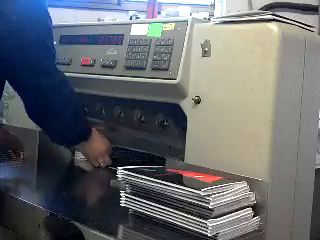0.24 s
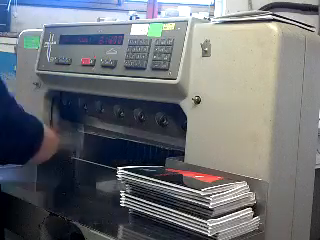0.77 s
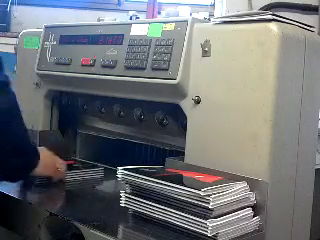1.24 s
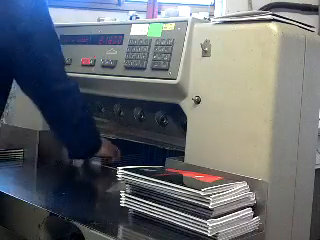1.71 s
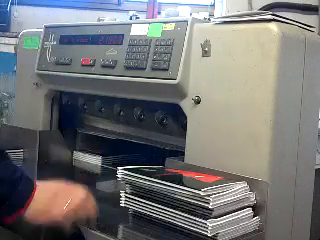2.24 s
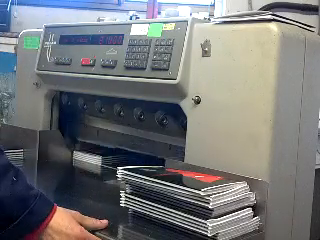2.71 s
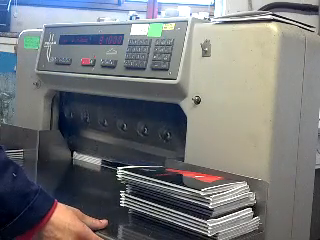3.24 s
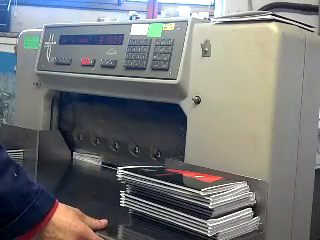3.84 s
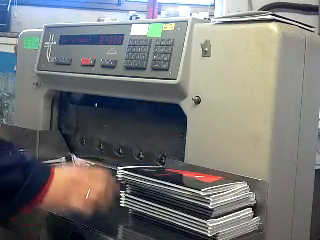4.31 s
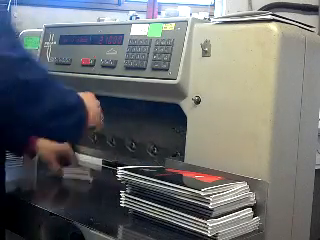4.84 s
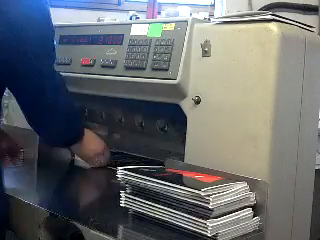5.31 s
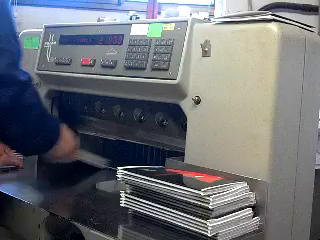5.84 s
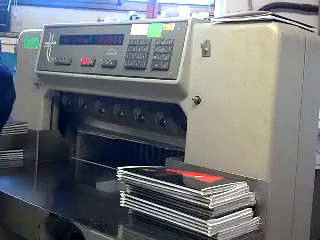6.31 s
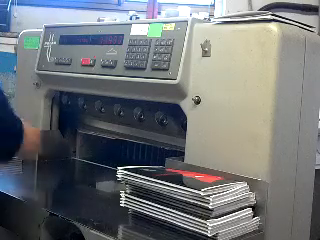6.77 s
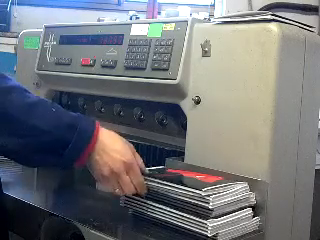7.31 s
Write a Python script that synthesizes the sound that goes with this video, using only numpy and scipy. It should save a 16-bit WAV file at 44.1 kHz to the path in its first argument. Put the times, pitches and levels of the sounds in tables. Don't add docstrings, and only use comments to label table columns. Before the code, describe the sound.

In a print workshop, a paper cutter thuds, hums and clanks through one stroke, followed by stack knocks and a rising, braking motor whine.

```python
import sys
import numpy as np
from scipy import signal
from scipy.fft import rfft, irfft, next_fast_len
from scipy.io import wavfile
from scipy.ndimage import uniform_filter1d, map_coordinates

SR = 44100
rng = np.random.default_rng(int(sys.argv[2]) if len(sys.argv) > 2 else 0)


def digitize_waveform(pressure):
    field = np.atleast_2d(pressure).T
    bounded = np.clip(field, -1, 1)
    quanta = np.round(bounded * 32767).astype(np.int16)
    wavfile.write(sys.argv[1], SR, quanta)


def invert_db(level):
    return 10 ** (np.asarray(level, dtype=float) / 20)


N = 332955
TIME = np.arange(N) / SR


def unit(x):
    return x / np.sqrt(np.mean(x ** 2) + 1e-20)


def along(points, hz):
    f, v = np.transpose(points)
    return np.interp(np.log(hz + 1), np.log(f + 1), v)


def ramp(start, length):
    return np.clip((TIME - start) / length, 0, 1)


def curves(rows):
    s, *cols = np.transpose(rows)
    gate = np.clip(np.minimum(TIME - s[0], s[-1] + .02 - TIME) / .02, 0, 1)
    return [gate] + [np.interp(TIME, s, c) for c in cols]


def wobble(rate):
    return map_coordinates(rng.standard_normal(int(N * rate / SR) + 4), [TIME * rate])


def filtered(x, response):
    m = next_fast_len(N + SR // 2)
    return irfft(rfft(x, m) * response(np.fft.rfftfreq(m, 1 / SR)), m)[..., :N]


def resonances(modes, f):
    total = 0
    for k, (c, w, db) in enumerate(modes):
        total = total + (-1) ** k * invert_db(db) * 1j * f * w / (c * c - f * f + 1j * f * w)
    return total


def noise(spectrum, modes=(), ring_db=0):
    colour = lambda f: invert_db(along(spectrum, f)) * (1 + invert_db(ring_db) * np.abs(resonances(modes, f)))
    return unit(filtered(rng.standard_normal((2, N)), colour))


# start_s, clank_db, thud_db, crack_db, t60_s
KNOCKS = [(.567, -39, -31.5, 11, 0.17), (.649, -46.5, -13, 2, 0.38), (.688, -45, 4.5, -3.5, 0.23),
          (.891, -38.5, -3, -10.5, .3), (1.049, -19.5, -6, 2, 0.13), (1.572, -11, -24, -24.5, 0.21),
          (1.703, -20.5, -8.5, -7.5, 0.28), (2.17, -42.5, -32, -9, 0.48), (4.573, -46, 6, -2, 0.37),
          (5.19, -48, -4, 2.5, 0.093), (5.615, -56.5, 0, 8.5, 0.14), (5.349, -51, -0.5, -8, 0.4),
          (5.73, -50.5, -17, 2.5, 0.77), (5.828, -33.5, -17, 0.7, 0.16), (5.906, -44.5, 7, -5, 0.28),
          (5.977, -42.5, -14, -4, 0.22)]
DROPS = [
    (4.165, -39.5, -3, 2.5, 0.2),
    (1.253, -22.5, -14, -8.5, 0.24),
    (.39, -46, -11, 2.5, 0.26),
    (0.532, -53, -16, 22.5, 0.19),
    (0.7575, -28.5, -4, -1.5, 0.26),
    (1.552, -32, -12, -30, 0.13),
    (4.667, -56, 5, 15, 0.13),
    (4.925, -18.5, -4, -11, 0.24),
    (5.574, -48.5, 0, -3.5, 0.19),
]
LATCHES = [
    (2.382, -28.5, -29, -7.5, 0.24),
    (2.416, -28.5, -16, -12, 0.12),
    (3.002, -17, -4.5, -12.5, 0.39),
    (3.782, -42.5, 3.5, 8, 0.46),
    (3.902, -39, 3.5, 3.5, 0.49),
    (6.422, -29.5, 1, -9, 0.27),
    (7.177, -39, 1, -11.5, 0.23),
]
SLAMS = [
    (2.454, -35.5, 0.5, -2, 1),
    (3.828, -30.5, -3, 8, .14),
    (3.975, -34, 1, 0.5, .6),
    (4.072, -30.5, 3.5, -20.5, 0.4),
    (4.333, -34.5, -10, -16, 0.17),
    (4.342, -24.5, -3, -26.5, 0.2),
    (6.066, -35, 0, -11.5, 0.56),
    (6.686, -22, -33, -10.5, 0.2),
    (7.246, -39.5, 6.5, -20.5, 0.44),
    (7.312, -27, -14, -27, 0.073),
]
CLAMP = [
    (2.549, -10, -9, -4.5, 0.22),
    (4.105, -35.5, 12.5, -10, .2),
    (4.165, -44.5, -8, 8.5, .12),
    (6.1, -46, 14, -10, .4),
    (7.165, -50.5, 15.5, -10, .25),
]
# pitch_hz, level_db (per Hz)
THUD = [(70, -11), (140, -0.5), (250, -2.5), (450, -8.5), (800, -25.5), (2000, -57.5)]
CLANK = [(200, -13), (500, 0), (700, 1.5), (1200, -1.5), (2100, -6.5), (3400, -6), (6000, -21.5),
         (11000, -40)]
CRACK = [(1000, -39.5), (2500, -8.5), (3500, -5.5), (5000, -0.5), (7500, -3.5), (11000, -5.5)]
# pitch_hz, level_db, t60_s
TABLE = [(1040, -2.5, 0.53), (1367, -14.5, 1.7), (1590, -6, 0.1), (1918, 3, 0.21), (2240, -13, 0.074),
         (3106, -30.5, 0.41), (3800, -22.5, 0.56)]


def hits():
    t, env = np.arange(SR) / SR, np.zeros((3, N + SR))
    kinds = (KNOCKS, 0.0023), (DROPS, 0.011), (LATCHES, 0.0023), (SLAMS, 0.0072), (CLAMP, 0.014)
    first_contact = 1 + invert_db(-60 * t / 0.014)
    slower_bass = np.array([[1.4], [1], [.7]])
    for rows, rise_s in kinds:
        for start_s, clank_db, thud_db, crack_db, t60_s in rows:
            fall_db = -60 * t / (max(t60_s, .01) * slower_bass)
            part_db = np.array([[thud_db + 6.5], [-5], [crack_db - 3.5]])
            rise = 1 - np.exp(-t / rise_s)
            shape = first_contact * invert_db(fall_db + clank_db + part_db) * rise
            env[:, round(start_s * SR):][:, :SR] += shape ** 2
    steel = [(hz, 9 / t60_s, db) for hz, db, t60_s in TABLE]
    parts = noise(THUD), noise(CLANK, steel, ring_db=-2.5), noise(CRACK)
    return sum(np.sqrt(e[:N]) * part for e, part in zip(env, parts))


# pitch_hz, t60_s
RINGS = [(146, 0.82), (187, 0.23), (208, 0.44), (299, 0.29), (336, 2.14), (408, 0.34), (475, 0.43),
         (535, 0.47), (748, .55), (900, 0.13), (1022, 1), (1243, 0.092), (2508, 0.13), (3170, 0.28),
         (587, 0.16), (672, 0.29), (850, 0.13), (955, .15), (1140, 0.11), (1380, 0.13), (1560, 0.11),
          (1750, 0.13), (1960, 0.11)]
# start_s, level_db
STRUCK = [
    [(.765, -17), (1.26, -27.5), (4.08, -20)],
    [(.79, -14.5), (.85, -20), (7.18, -16), (4.12, -15), (6.11, -16), (6.15, -16)],
    [(1.05, -36), (4.08, -11), (6.1, -19.5), (6.2, -19), (6.36, -13), (6.87, -26.5)],
    [(.7, -32), (1.58, -15), (1.7, -19), (3.01, -12), (3.85, -17), (4.07, -19), (4.93, -16)],
    [(1.581, -31.5)],
    [(1.58, -13.5)],
    [(4.365, -28)],
    [(1.26, -40), (6.36, -18)],
    [(6.8, -41.5)],
    [(1.05, -34), (4.345, -30), (4.932, -23)],
    [(.89, -51), (1.26, -49.5), (6.2, -27.5), (6.29, -30), (6.62, -29), (6.74, -31.5), (7.24, -40.5),
     (7.31, -30), (7.35, -30.5)],
    [(1.58, -16.5), (4.932, -21), (6.75, -28.5)],
    [(1.58, -22)],
    [(.89, -43), (1.26, -35.5)],
]
# start_s, level_db
MORE_STRUCK = [
    [(1.705, -26), (2.56, -20), (4.932, -26)],
    [(3.01, -22), (3.26, -31), (4.15, -26), (4.2, -30), (5.91, -39.5)],
    [(1.58, -22.5), (4.345, -27), (3.83, -29)],
    [(1.58, -24), (4.932, -29)],
    [(1.05, -30), (1.58, -19), (1.71, -24.5), (4.935, -23)],
    [(1.26, -38), (2.56, -22), (4.932, -24.5)],
    [(1.58, -28), (3.01, -24), (4.935, -25), (6.07, -31), (7.175, -40), (7.31, -40)],
    [(1.71, -23), (3.01, -19), (4.935, -30)],
    [(1.26, -39), (2.56, -24.5), (6.72, -30)],
]


def rings():
    t, out = np.arange(SR) / SR, np.zeros(N + SR)
    drift, swell = wobble(70), wobble(30)
    rise = 1 - np.exp(-t / 0.0035)
    k = 0
    for (hz, t60_s), blows in zip(RINGS, STRUCK + MORE_STRUCK):
        wander = 0.39 + min(.08 / t60_s, .6) + min(t60_s ** -.5 / 2, 1) * (hz / 1500) ** 2
        for start_s, level_db in blows:
            turn = 2 * np.pi * hz * t + wander * np.roll(drift, -9000 * k)[:SR]
            fall_db = level_db - 60 * t / t60_s + 2.7 * np.roll(swell, -9000 * k)[:SR]
            out[round(start_s * SR):][:SR] += invert_db(fall_db) * rise * np.sin(turn)
            k += 1
    return out[:N]


# start_s, peak_db
TICKS = [(0.038, -44), (0.0648, -26.5), (0.0984, -25.5), (0.1768, -55.5), (0.391, -35.5), (.5665, -27),
         (0.569, -22), (.573, -23), (.67, -41.5), (0.6916, -36), (1.0522, -23.5), (1.5803, -37),
         (2.385, -31), (3.0079, -22), (3.824, -28.5), (3.834, -27), (3.862, -29.5), (3.954, -29.5),
         (4.0011, -26.5), (4.0703, -19), (4.083, -17), (5.1878, -38), (5.4351, -42.5), (5.5743, -42),
         (5.734, -37.5), (5.7595, -40), (5.826, -29.5), (5.831, -28), (5.8352, -22.5), (5.841, -31),
         (5.9772, -36), (6.172, -38.5), (2.4175, -28), (2.581, -16.5), (6.9975, -45)]


def ticks():
    t, env = np.arange(SR // 10) / SR, np.zeros(N + SR)
    t60_s, rise_s = 0.008, .0003
    for start_s, peak_db in TICKS:
        snap = invert_db(peak_db + 3.5 - 60 * t / t60_s) * (1 - np.exp(-t / rise_s))
        env[round(start_s * SR):][:len(t)] += snap
    return env[:N] * noise([(200, -4.5), (1000, -2.0), (5000, 1.5), (11000, 1.5), (12500, 17), (14000, -31)])


# start_s, swell_s, fade_s, hiss_db, body_db (over the hiss)
SLIDES = [
    (0.028, 0.067, 0.11, -38, 0.8),
    (5.195, 0.05, 0.15, -44, -3),
    (6.055, 0.018, 0.082, -40.5, 4),
    (7.148, 0.027, 0.051, -38.5, 2.5),
]


def slides():
    hiss = unit(invert_db(1.5 * wobble(300)) * noise(CRACK))
    body = noise(CLANK)
    out = 0
    for start_s, swell_s, fade_s, hiss_db, body_db in SLIDES:
        swell_db = -11 * (1 - ramp(start_s, swell_s))
        decay_db = -24.5 * np.maximum(TIME - start_s - swell_s, 0) / fade_s
        stroke = (TIME > start_s) * invert_db(swell_db + decay_db)
        out = out + stroke * invert_db(hiss_db + 1.5) * (hiss + invert_db(body_db - 4.0) * body)
    return out


PRESS = 2.5, 0.03, 2.5, -25, 260
# pitch_hz, level_db (per Hz)
SQUEEZE = [(120, -19), (250, -6), (420, 1.5), (680, -0.5), (1500, -12.5), (2200, -17.5), (3500, -24),
           (6000, -40)]


def press():
    start_s, swell_s, end_s, db, dies_db = PRESS
    level_db = db - dies_db * np.maximum(TIME - end_s, 0) + 3.2 * wobble(60)
    return ramp(start_s, swell_s) ** 2 * invert_db(level_db) * noise(SQUEEZE)


# time_s, level_db
PUMP = [
    (2.46, -32.5),
    (2.75, -40.5),
    (3.0, -35.5),
    (3.14, -33.5),
    (3.21, -30.5),
    (3.3, -41),
    (3.8, -38),
    (4.05, -47),
    (4.15, -60),
]
# multiple, idle_db, loaded_db
VANES = [(0.99, 5.5, -6), (1.92, 0, -5.5), (3.02, -8.5, -0.5), (4, -16.5, -5), (5.07, -29.5, -9),
         (6, -27, -22), (6.9, -21, -15.5), (7.86, -28.5, -13.5), (12.4, -27, -14), (20.5, -39.5, -22.5),
         (35, -34, -35)]


def pump():
    on, db = curves(PUMP)
    idle_hz, stall_hz, loaded_hz = 296, 225, 275
    engage_s, sag_s, recover_s, settle_s = 3.0, .06, 3.215, .085
    stall_load, full_load = 0.6, 0.94
    engaged = ramp(engage_s, sag_s)
    settled = 1 - np.exp(-np.maximum(TIME - recover_s, 0) / settle_s)
    hz = idle_hz + (stall_hz - idle_hz) * engaged + (loaded_hz - stall_hz) * settled
    load = np.clip(stall_load * engaged + (full_load - stall_load) * ramp(recover_s, settle_s), 0, 1)
    turn = 2 * np.pi * np.cumsum(hz * (1 + 0.00123 * (1 + 6 * load) * wobble(35))) / SR
    sag = np.clip((274 - hz) / 50, 0, 1)
    order, idle_db, loaded_db = np.transpose(VANES)
    stack = 0
    for k in range(1, 37):
        line_db = (1 - load) * np.interp(k, order, idle_db) + load * np.interp(k, order, loaded_db)
        line_db = line_db + (2.5 + 1.9 * load) * wobble(45) - 0.5 * k * sag
        jitter = (0.57 * load + 0.028 * k) * wobble(70)
        stack = stack + invert_db(line_db) * np.sin(k * turn + jitter + rng.uniform(0, 2 * np.pi))
    housing = filtered(load * stack, lambda f: resonances([(702, 64, 6.4)], f))
    return on * invert_db(db + 3.5) * (stack + housing)


# time_s, level_db
DRIVE = [
    (2.68, -52),
    (2.778, -43.5),
    (2.995, -45),
    (3.005, -37),
    (3.8, -33.5),
    (3.83, -41.5),
    (4.06, -35.5),
    (4.13, -33.5),
    (4.3, -64.5),
]
# start_s, added_db
SURGES = [
    (2.998, 22),
    (4.068, 14),
]
# pitch_hz, level_db (per Hz)
GEARS = [(60, 0.5), (130, 12.5), (250, 1), (450, -4.5), (690, 3.5), (1000, -3.5), (2062, -12), (3440, -20),
         (6200, -34), (10300, -31)]
# pitch_hz, width_hz, level_db
FRAME = [(284.7, 19, 11), (539, 5.4, 3), (857, 52, -6)]
# pitch_hz, level_db (per Hz)
OIL = [(1000, -32.5), (2500, 1), (4000, -5.5), (5500, -5), (7500, -17.5), (9000, -5), (10500, -6.5)]


def drive():
    on, effort_db = curves(DRIVE)
    for start_s, added_db in SURGES:
        effort_db = effort_db + (TIME > start_s) * added_db * np.exp(-np.abs(TIME - start_s) / 0.0074)
    rumble = invert_db(effort_db + 1.1 * wobble(25.07)) * noise(GEARS, FRAME, ring_db=6.5)
    oil_db = np.where(TIME > 3.0, -3, -8) - 6
    oil = invert_db(effort_db + oil_db + 1.1 * wobble(40)) * noise(OIL)
    return on * (rumble + oil)


def gauge_run(top_hz, start, wind_up, brake, start_db, cruise_db):
    release_s = .042
    braked_hz, brake_s, grip_s = 597.5, .08, 0.052
    bite_hz = 169.7
    speed = 1 - np.exp(-np.maximum(TIME - start - release_s, 0) / wind_up)
    braked = np.maximum(TIME - brake, 0)
    stopped = np.maximum(braked - grip_s, 0)
    pull_hz = top_hz * speed - bite_hz * ramp(brake, 0.0092) - braked_hz
    hz = braked_hz + pull_hz * np.exp(-braked / brake_s)

    free_db = start_db - 10.5 * (1 - speed) + (cruise_db - start_db) * speed ** 25
    free_db = free_db + 9 * np.exp(-((hz - 1370) / 90) ** 2)
    free_db = free_db - 7 * np.exp(-((hz - 1537) / 45) ** 2)
    squeal_db = -21.5 + 5 * ramp(brake, grip_s) - 444 * stopped
    mesh_db = free_db + (squeal_db - free_db) * ramp(brake, 0.0068)

    strain_db = 3.5 * np.exp(-((speed - 0.913) / 0.083) ** 2)
    rumble_db = -26 + strain_db - 17.5 * (1 - speed) - 181.5 * stopped
    return ramp(start, .04), hz, mesh_db, rumble_db


MESH_HZ = (1616, 1655)
# start_s, wind_up_s (time constant), brake_s, start_db (mesh winding up), cruise_db (mesh at speed)
GAUGE = [
    (6.075, .097, 6.676, -33, -44.5),
    (7.192, .076, 7.7, -38, -20.5),
]


def gauge_runs():
    return [gauge_run(top_hz, *run) for top_hz, run in zip(MESH_HZ, GAUGE)]


# mesh_share, level_db
SHAFTS = [(.125, 3), (0.211, -0.5), (.345, -9), (.545, -12), (.69, -16.5)]
# pitch_hz, level_db
MAINS = [(200, 6), (236, 5)]
# pitch_hz, level_db, t60_s
COVER = [(737, -22, 0.38), (923, -2, 0.26), (1053, -1, 0.14), (1280, -7, 0.74)]


def gauge_whine():
    tone = 0
    for (on, hz, db, rumble_db), run in zip(gauge_runs(), GAUGE):
        rough = np.where(TIME > run[2], 1, .3)
        turn = 2 * np.pi * np.cumsum(hz * (1 + 0.016 * rough * wobble(150))) / SR
        mesh_db = db + 5.0 + 2.6 * np.sqrt(rough) * wobble(110) + 2.2 * wobble(22)
        mesh = invert_db(mesh_db) * np.sin(turn + 1.14 * rough * wobble(200))
        shafts = sum(invert_db(rel_db + 2.8 * wobble(35)) * np.sin(share * turn + .7 * wobble(50))
                     for share, rel_db in SHAFTS)
        hum = sum(invert_db(rel_db + 1.6 * wobble(26)) * np.sin(2 * np.pi * f * TIME + .5 * wobble(18))
                  for f, rel_db in MAINS)
        tone = tone + on * (mesh + invert_db(rumble_db - 2.5) * shafts + invert_db(rumble_db - 6.0) * hum)
    cover = [(hz, 7.0 / t60_s, db) for hz, db, t60_s in COVER]
    return tone + invert_db(6) * filtered(tone, lambda f: resonances(cover, f))


# pitch_hz, level_db (per Hz)
CARRIAGE = [(60, 5), (130, 6), (250, -1.5), (450, -7), (690, -8.5), (1000, -10), (2062, -23.5), (3440, -32),
            (6200, -31), (10300, -66.5)]
# pitch_hz, width_hz, level_db
CASING = [(206.6, 10.5, 9.5), (525, 47, 0), (1005, 280, -6), (1420, 54, -7.5)]
# pitch_hz, width_hz, level_db
BEARING = [(3200, 100, 11), (5770, 110, -10.5)]


def carriage():
    rumble = invert_db(1.18 * wobble(45)) * noise(CARRIAGE, CASING, ring_db=3.5)
    hiss = noise(CRACK, BEARING, ring_db=16.5)
    shaking = invert_db(3.0) * rumble + invert_db(-24) * hiss
    return sum(on * invert_db(rumble_db) * shaking for on, _, _, rumble_db in gauge_runs())


# time_s, level_db
BUSTLE = [(0, -59), (.5, -60), (.97, -62.5), (1.2, -65.5), (1.98, -70), (2.42, -67), (4.2, -67),
          (4.75, -66), (5.2, -63.5), (5.7, -64.5), (6, -58.5), (6.9, -64), (7.1, -60), (7.55, -56.5)]
# pitch_hz, level_db (per Hz)
HUM = [(60, -16), (130, 8.5), (250, -1.5), (450, -8), (690, -15), (1000, -15), (2000, -31.5), (4000, -50.5)]


def shop():
    busy_db = curves(BUSTLE)[1]
    machines = noise(HUM, [(324, 97, 6.7), (447, 7.1, 1.9), (214, 15, 4.9)], ring_db=5.5)
    air = noise([(800, -2.5), (2000, 1.0), (5000, -0.5), (8000, -6.0), (11000, -4.5)])
    hum = invert_db(busy_db + 16.5 + 0.53 * wobble(6.4)) * machines
    return hum + invert_db(busy_db - 1.5 + 0.83 * wobble(25)) * air


# pitch_hz, t60_s
ROOM = [(150, 0.66), (1000, 0.32), (4000, 0.39), (11000, 0.16)]


def room(x):
    hz, t, z = signal.stft(rng.standard_normal((2, SR // 2)), SR, nperseg=256)
    fall = invert_db(-60 * t / along(ROOM, hz)[:, None])
    tail = signal.istft(z * fall, SR, nperseg=256)[1]
    return signal.fftconvolve(x, tail / np.linalg.norm(tail[0]), axes=1)[:, :N]


# pitch_hz, level_db
WIDTH = [(60, -43), (130, -18.5), (250, -18.5), (450, -11.5), (700, -8), (1000, -2.5), (2000, 2.5),
         (4000, -1.5), (11000, 3)]


def scene():
    tones = (pump() + gauge_whine() + rings()) * invert_db([[-4], [-7]])
    near = press() + hits() + ticks() + slides() + tones
    mid, side = near + invert_db(-10.5) * room(near) + drive() + carriage() + shop()
    side = side + filtered(mid, lambda f: (-.6 - .7j) / (1 + (f / 450) ** 2))
    side = filtered(side, lambda f: invert_db(along(WIDTH, f)))
    return np.array([mid + side, mid - side])


def starved(x, weaker_db, step_db, masked_db, attack_db):
    z = signal.stft(np.array([x[0] + x[1], x[0] - x[1]]) / 2, nperseg=1024)[2]
    fine = uniform_filter1d(np.abs(z) ** 2, size=3, axis=2)
    power = uniform_filter1d(fine, size=5, axis=1)
    broad = np.exp(uniform_filter1d(np.log(fine.mean(axis=0) + 1e-20), size=60, axis=0))
    step = invert_db(2 * step_db) * broad + invert_db(2 * masked_db) * power.max(axis=(0, 1))
    step[:70] = 0
    keep = (power > invert_db(2 * weaker_db) * power[::-1]) & (fine > step)
    keep[:, :24] = True
    keep[:, 257:] = False
    treble = np.sum(np.abs(z[:, 70:]) ** 2, axis=(0, 1))
    keep[..., treble > invert_db(2 * attack_db) * np.roll(treble, 1)] = True
    mid, side = signal.istft(z * keep, nperseg=1024)[1][:, :N]
    return np.array([mid + side, mid - side])


def low_pass(x):
    return signal.sosfilt(signal.butter(12, 11660, fs=SR, output="sos"), x)


def record(dry):
    cross_lag_s, top_hz = 16 / 44100, 11025
    late = filtered(dry[::-1], lambda f: np.exp(-2j * np.pi * f * cross_lag_s))

    def band(f):
        top = np.where(f < top_hz, 1, invert_db(-15.5 - (f - top_hz) / 50))
        return top * (0.018 + f ** 3 / (f ** 3 + 115 ** 3))

    wide = filtered(0.68 * (dry - 0.87 * late), band)
    mix = starved(wide, weaker_db=-7.5, step_db=-2.2, masked_db=-61, attack_db=7.0)
    return low_pass(mix)


dry = scene()
out = record(dry)
digitize_waveform(out)
```